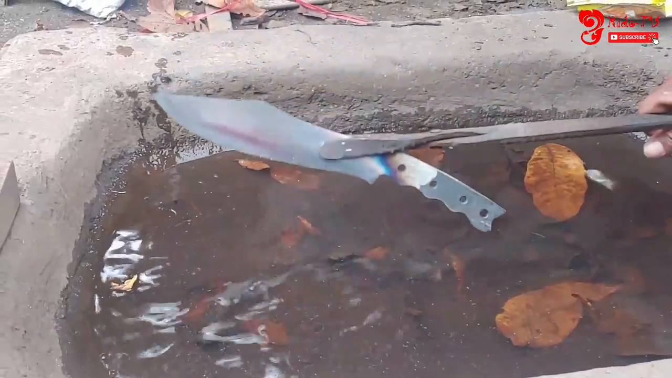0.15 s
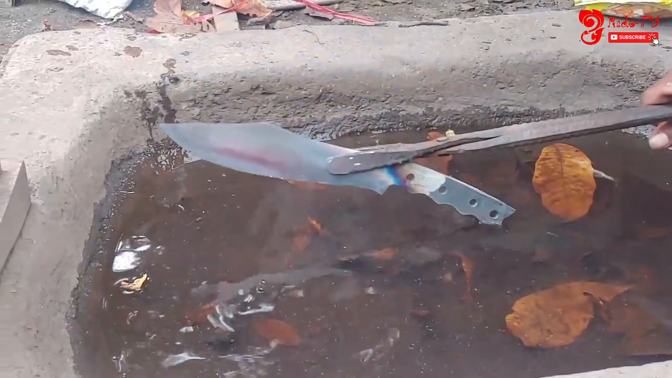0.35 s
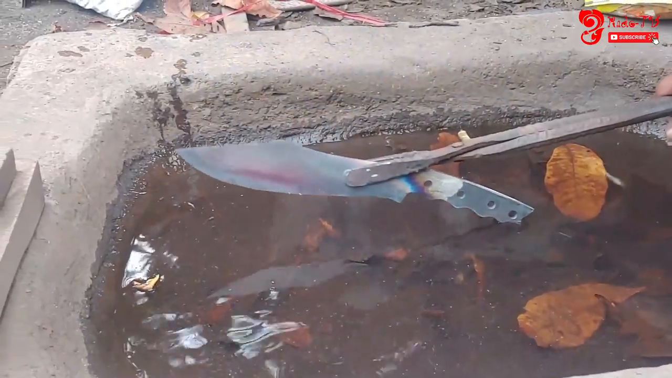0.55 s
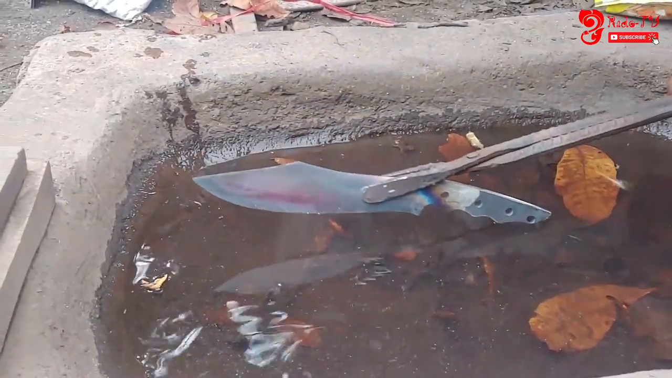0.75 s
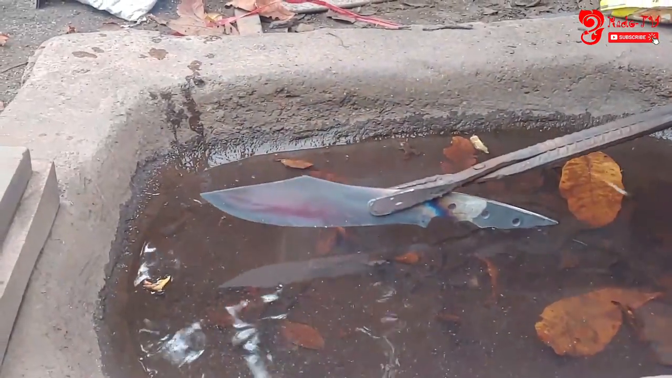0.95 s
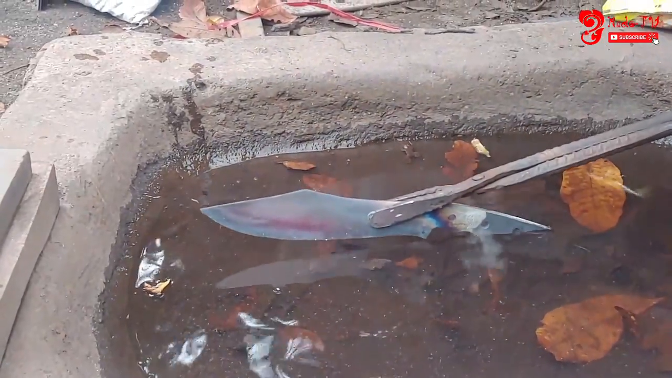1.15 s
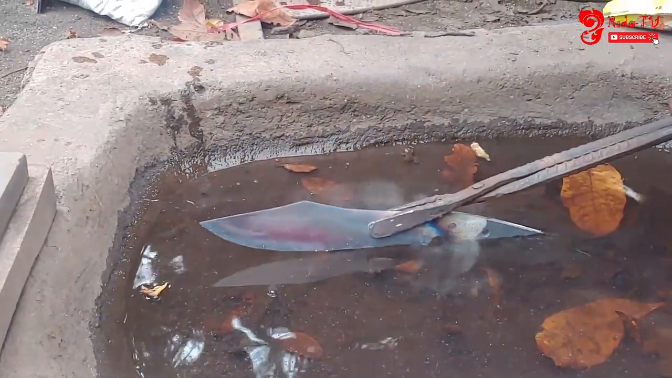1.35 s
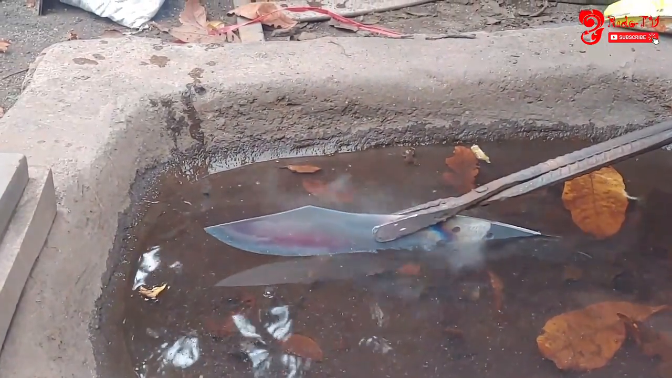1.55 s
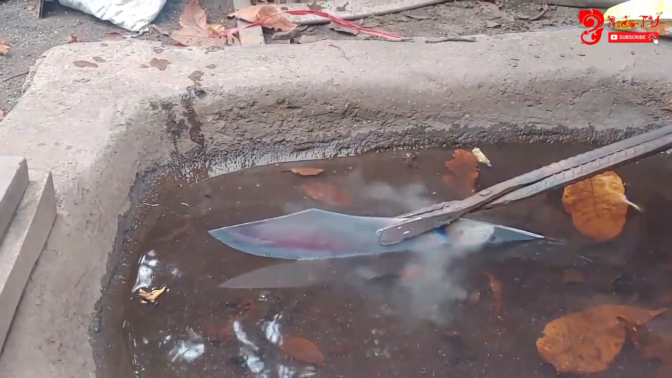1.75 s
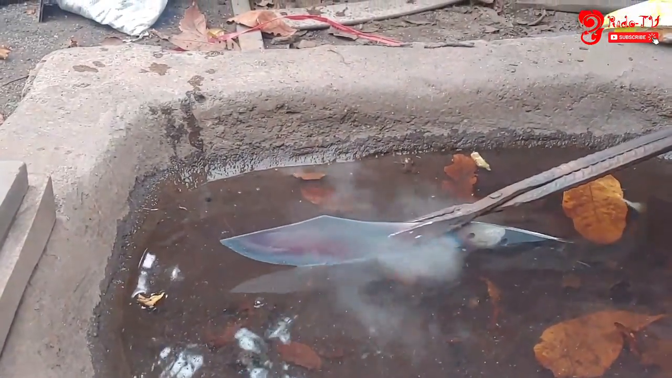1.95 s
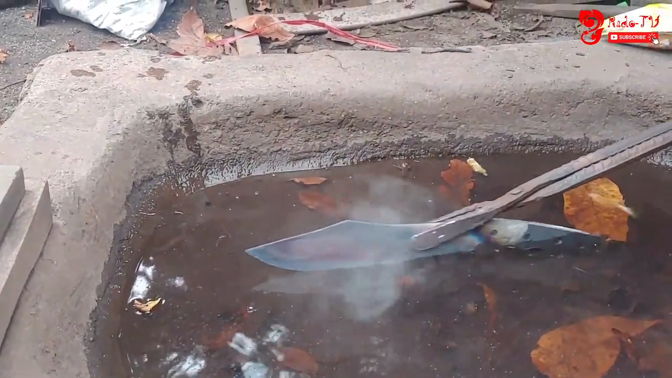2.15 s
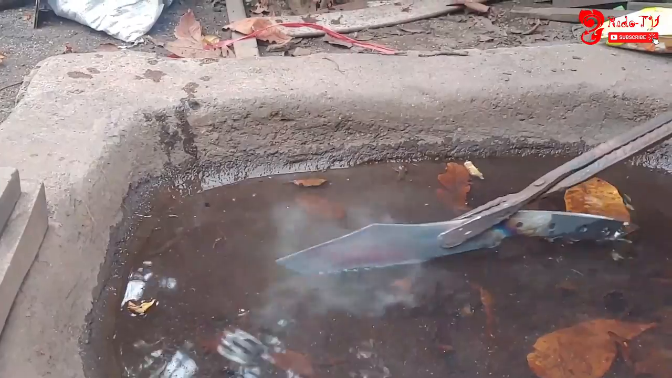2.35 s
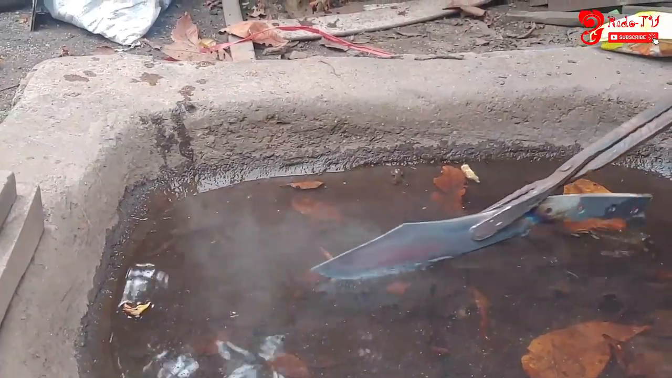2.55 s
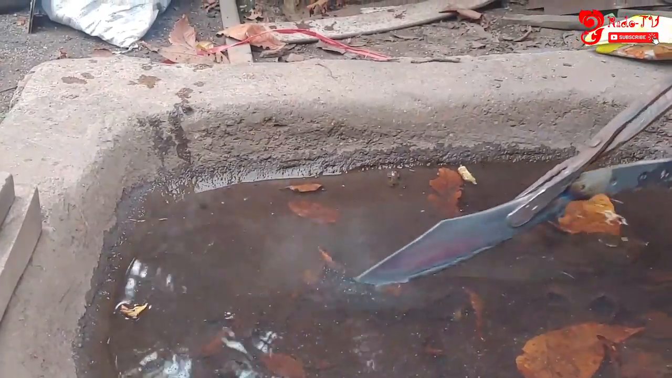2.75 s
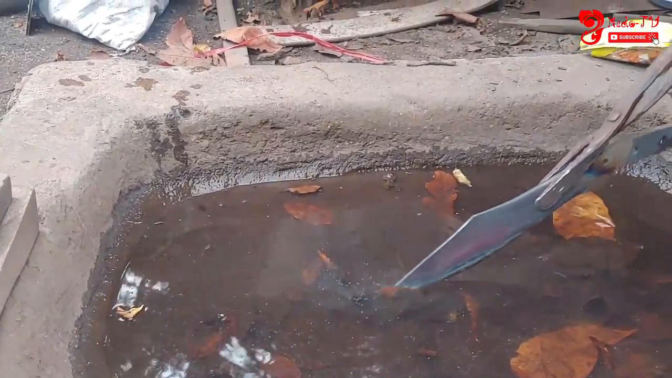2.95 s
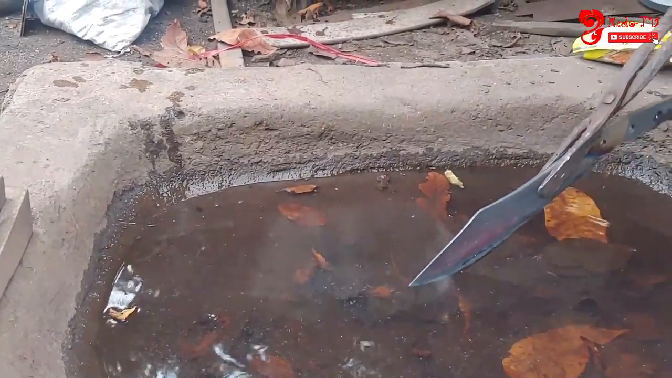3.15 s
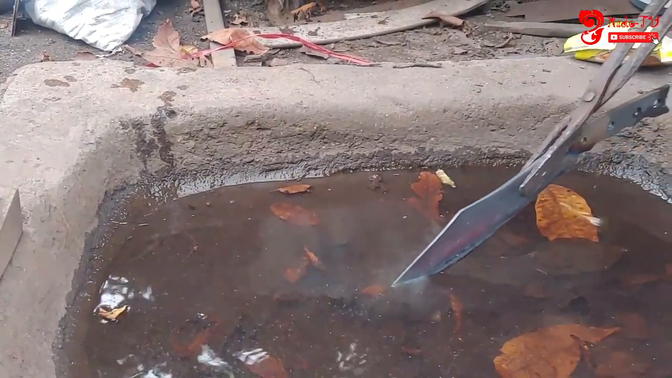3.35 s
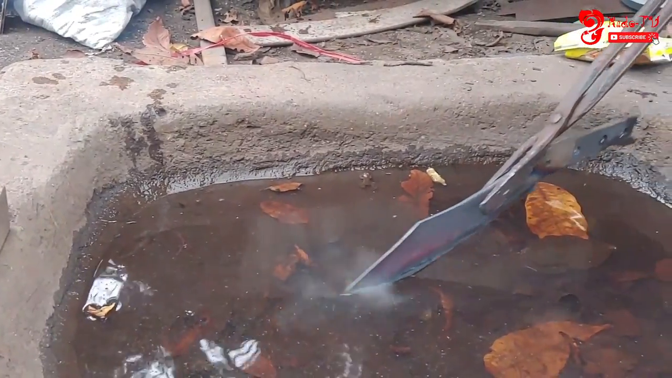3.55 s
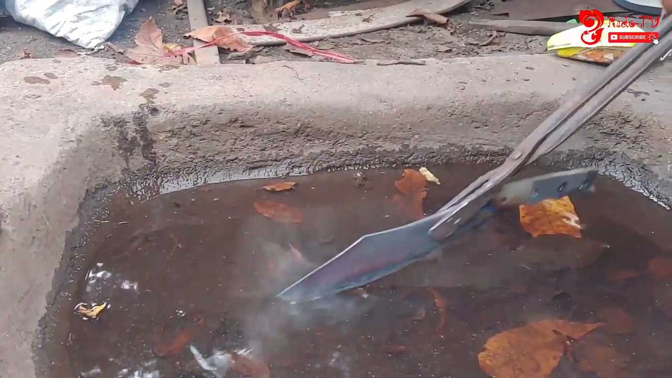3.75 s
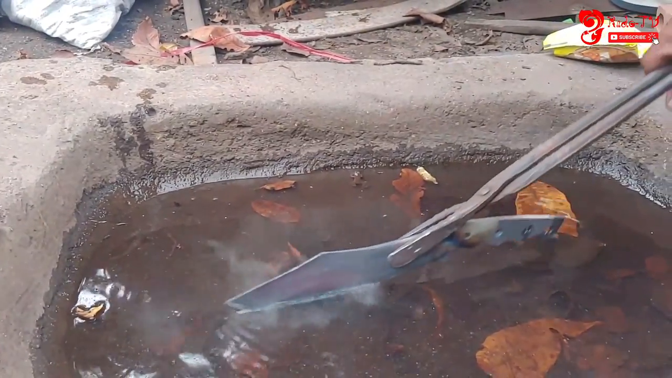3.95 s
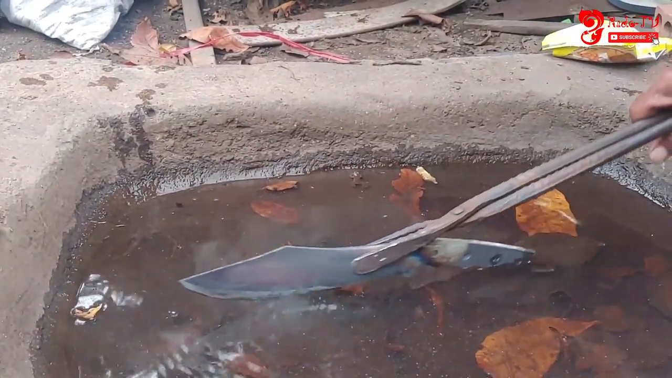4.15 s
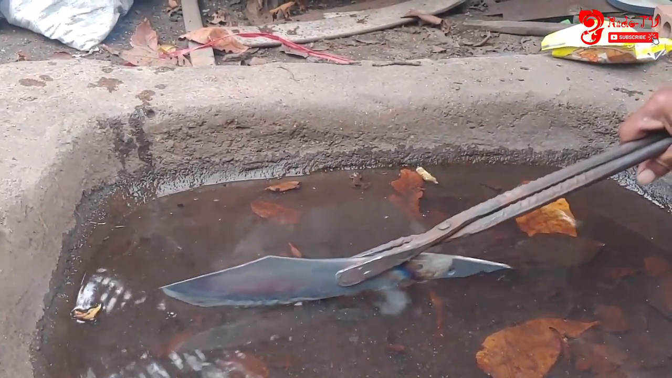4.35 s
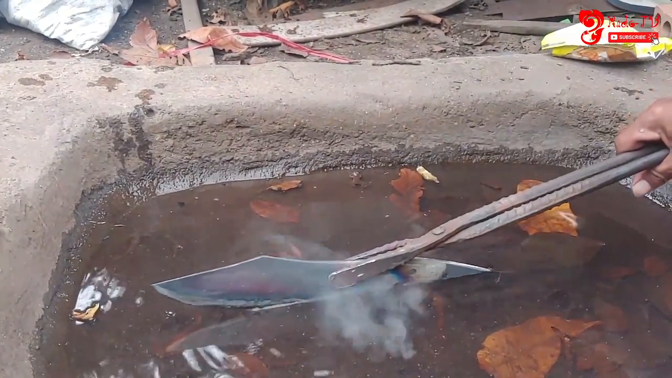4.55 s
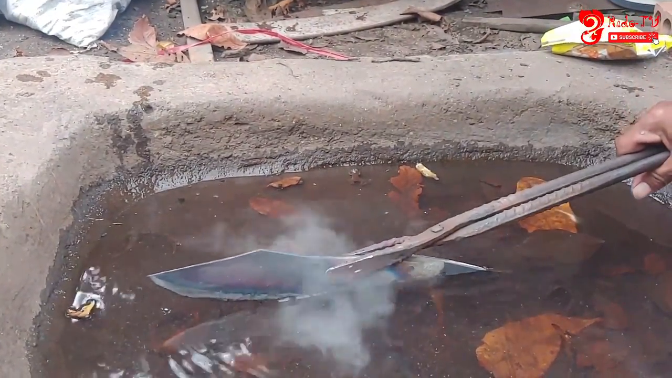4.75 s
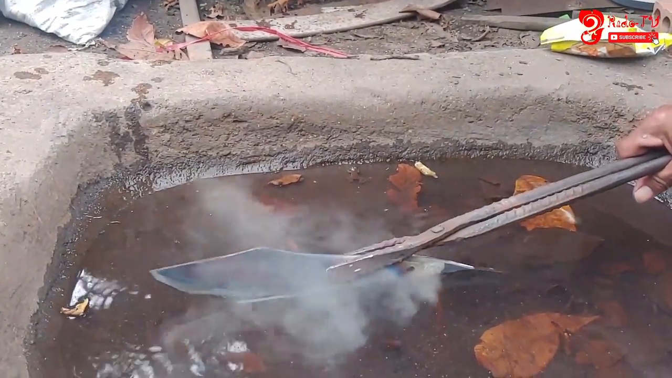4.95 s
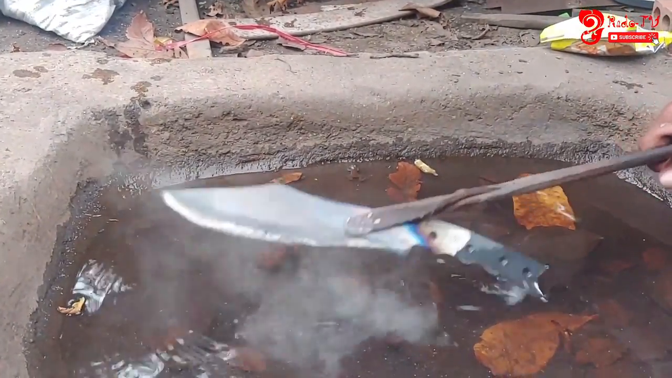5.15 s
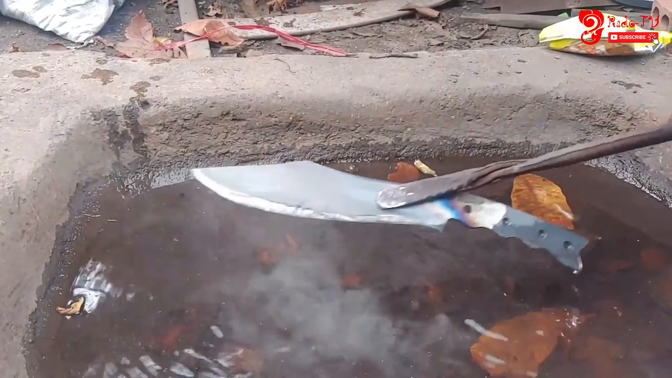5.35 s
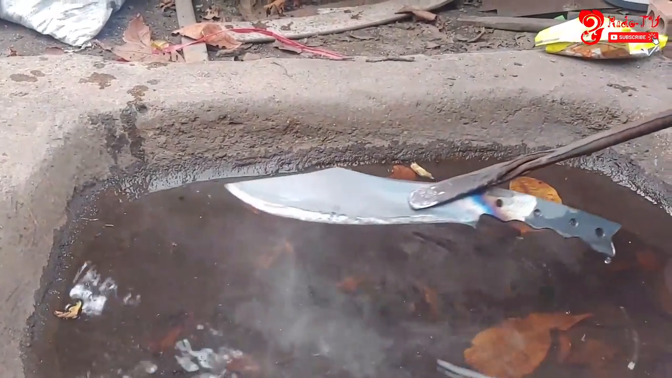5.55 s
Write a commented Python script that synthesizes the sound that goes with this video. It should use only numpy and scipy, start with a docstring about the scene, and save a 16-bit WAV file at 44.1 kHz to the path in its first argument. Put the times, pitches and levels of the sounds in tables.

```python
"""A faint idling thump and thin far whistles come first, then a red-hot blade enters a stone trough of water.
It goes in edge first, is rocked, dipped again and lifted out: steam bubbles burst as noisy clicks that hiss,
larger pockets spit as short ringing puffs, and wet steel sizzles on.
Beyond the open workshop a small bird whistles twice (gliding sines) and a single-cylinder engine picks up
speed (a pop and a pipe ring per firing). A far hum and quiet outdoor noise lie behind."""
import sys
import numpy as np
from scipy import signal
from scipy.fft import rfft, irfft
from scipy.io import wavfile

SR = 44100
rng = np.random.default_rng(int(sys.argv[2]) if len(sys.argv) > 2 else 0)


def file_out(sig):
    """Save sig as 16-bit WAV at sys.argv[1]."""
    # one column per channel
    cols = np.atleast_2d(sig).T
    # limit, then scale
    lim = np.clip(cols, -1, 1)
    pcm = np.round(lim * 32767).astype(np.int16)
    wavfile.write(sys.argv[1], SR, pcm)


N = 247401
TIME, HZ = np.arange(N) / SR, np.fft.rfftfreq(N, 1 / SR)

# fizz spectrum, relative: f/Hz, level/(dB per Hz)
FIZZ_SPECTRUM = [(200, -35.5), (1350, -42.5), (1750, -18.5), (2020, -25.5), (2400, -19.5), (3250, -15),
                 (3700, -13), (4800, -12), (5700, -8), (6500, -1.5), (7500, 0), (9000, -12), (12000, -15.5),
                 (15700, -25.5)]
# resonances of the churning water in the trough, relative: f/Hz, width/Hz, level/dB
TROUGH_MODES = [(370, 130, -13), (631, 76, -7.5), (1073, 125, 3), (1305, 88, 1), (1833, 170, 6.5),
                (2396, 330, 7.5), (3260, 810, 6.5)]
# thin sizzle of the wet steel, relative: f/Hz, width/Hz, level/dB
SIZZLE_MODES = [(2740, 360, -4), (4740, 1300, -3.5), (7370, 2000, 12), (11700, 650, 5)]
# narrow bands of the first small point of contact, relative: f/Hz, width/Hz, level/dB
TOUCH_MODES = [(2400, 100, -26), (6260, 450, 4), (7280, 180, 10), (8600, 360, -0.5)]
# contact sizzle: t/s, level/dB
TOUCH_CURVE = [(.78, -83), (.818, -45), (.93, -50), (.975, -34.5), (1.12, -32.5), (1.3, -68), (1.5, -120)]
# hiss balance between the channels: f/Hz, left minus right/dB
CHANNEL_TILT = [(1000, 0.5), (1550, 1.5), (2000, -2), (4500, 1), (6400, -1), (7500, 10.5), (8500, 7.5),
                (10000, 1.5), (12500, -1.5), (15000, 0.5)]
FIZZ_TRIM_DB, SIZZLE_TRIM_DB = 3.5, 12.5  # added to the levels from boiling()


def quench():
    """The vapour film keeps collapsing and re-forming, so the boiling sputters."""
    fizz_gain, churn_gain, sizzle_gain = boiling()
    sputter = gain_of(.75 * waver(rate_hz=130))
    tilt = gain_of(read(CHANNEL_TILT) * np.array([[.5], [-.5]]))
    tilt = tilt / np.sqrt(np.mean(tilt ** 2, axis=0))

    fizz = bubbles(per_s=7000, spread_db=.5, wash=1, t60=.047, flicker_db=-.5)
    fizz = evened(colour(fizz, read_gain(FIZZ_SPECTRUM) * tilt))
    churn = bubbles(per_s=1500, spread_db=.5, wash=.84, t60=.029, flicker_db=0, count=4)
    churn = evened(slosh(colour(churn, resonances(TROUGH_MODES) * tilt)))
    sizzle = bubbles(per_s=2100, spread_db=-7.5, wash=.33, t60=.066, flicker_db=0, count=3)
    sizzle = evened(colour(sizzle, resonances(SIZZLE_MODES) * tilt))
    touch = evened(colour(rng.standard_normal((2, N)), resonances(TOUCH_MODES) * tilt))

    boil = fizz * fizz_gain * gain_of(FIZZ_TRIM_DB)
    boil = boil + churn * churn_gain
    boil = boil + sizzle * sizzle_gain * gain_of(SIZZLE_TRIM_DB)
    boil = boil + touch * gain_of(follow(TOUCH_CURVE)[0])
    return sputter * boil


# long first dip, going in then tilting out, before trims:
# t/s, tiny-bubble fizz level/dB, larger-bubble churn level/dB
FIRST_DIP = [
    [(0.77, -84, -82), (0.815, -51, -58), (0.925, -51.5, -75), (0.975, -41.5, -63), (1.07, -35, -57),
     (1.135, -25.5, -53), (1.44, -24, -42), (1.534, -17.5, -38.5), (2.002, -16, -34.5), (2.26, -18.5, -37),
     (2.36, -16, -34.5)],
    [(2.45, -20, -35), (2.6, -19.5, -34), (2.648, -19.5, -37), (2.68, -18.5, -33), (2.79, -21, -42.5),
     (2.846, -23.5, -49), (2.984, -21.5, -46.5), (3.022, -25, -54), (3.15, -30, -81)],
]
# later plunges, tip first, before trims:
# start t/s, length/s, fizz level/dB, churn level/dB, release/s, sizzle left on the wet steel level/dB
LATER_PLUNGES = [(3.093, 0.68, -20.5, -36.5, 0.06, -49), (3.851, 0.2, -15.5, -18.5, 0.12, -41.5),
                 (4.387, 0.29, -17, -23.5, 0.26, -52), (4.833, 0.22, -16.5, -18.5, 0.055, -67)]
FIZZ_ATTACK_S, CHURN_ATTACK_S = .051, .39  # tiny bubbles come at once, larger ones take time to grow
LIFT_DB_PER_S = 249  # the long dip dies as the tip leaves the water
HOT_CHURN_DB, DRYING_DB_PER_S = 6, 6  # extra churn in the long dip; fade of the sizzle after each plunge
DAMP_BEFORE_TRIM_DB, DAMP_AT_S, DAMP_SPAN_S = -81, .12, .11  # damp blade's one sizzle swell before the dip


def boiling():
    """Gains of fizz, churn and sizzle: plunges swell, hold, and die to a sizzle that lasts into the next."""
    dip = np.concatenate(FIRST_DIP)
    lifted_db = LIFT_DB_PER_S * np.maximum(TIME - dip[-1, 0], 0)
    # fizz and churn add up as powers
    fizz, churn = [gain_of(db - lifted_db) ** 2 for db in follow(dip)]
    churn = churn * gain_of(HOT_CHURN_DB) ** 2
    sizzle = gain_of(DAMP_BEFORE_TRIM_DB) * np.exp(-((TIME - DAMP_AT_S) / DAMP_SPAN_S) ** 2)
    next_starts = [row[0] for row in LATER_PLUNGES[1:]] + [np.inf]
    for (start, length, fizz_db, churn_db, release, left_db), until in zip(LATER_PLUNGES, next_starts):
        age_s = np.maximum(TIME - start, 0)
        out_s = np.maximum(TIME - start - length, 0)
        contact = np.exp(-(out_s / release) ** 2)
        fizz = fizz + ((1 - np.exp(-age_s / FIZZ_ATTACK_S)) * gain_of(fizz_db) * contact) ** 2
        churn = churn + ((1 - np.exp(-age_s / CHURN_ATTACK_S)) * gain_of(churn_db) * contact) ** 2
        left = gain_of(left_db - DRYING_DB_PER_S * out_s)
        sizzle = sizzle + (1 - contact) * left * (TIME < until + FIZZ_ATTACK_S)
    return np.sqrt(fizz), np.sqrt(churn), sizzle


# trough echoes reach the two channels in step (+) or opposed (-): f/Hz, likeness/1
CHANNEL_LIKENESS = [(600, 0.1), (1060, 0.68), (1410, 0.075), (1730, -0.041), (2030, -0.12), (2360, 0.36),
                    (2800, 0.07), (3280, -0.45), (3850, -0.016), (4650, 0.34), (5400, -0.26), (6200, 0.058),
                    (7400, -0.1), (10000, 0.081)]
ROAM_DB, ROAM_HZ = 5, 3  # the boiling wanders from spot to spot
WALL_ECHO, WALL_DELAY_MIN_S, WALL_DELAY_MAX_S = .28, .0008, .004  # each spot's own trough-wall echo


def bubbles(per_s, spread_db, wash, t60, flicker_db, count=6):
    """Bursts of uneven size roam over spots along the edge; trough walls colour each spot differently."""
    like = np.clip(read(CHANNEL_LIKENESS), -.95, .95)
    direct = np.sqrt(abs(like)) * np.array([np.ones_like(like), np.sign(like)])
    scattered = np.sqrt(1 - abs(like))
    out = 0
    for spot in range(count):
        activity = gain_of(ROAM_DB * np.tanh(waver(ROAM_HZ)))
        size_db = spread_db * np.minimum(rng.exponential(1, N), 4)
        size = gain_of(size_db + flicker_db * waver(rate_hz=21))
        bursting = rng.random(N) < per_s / count / SR
        clicks = evened(size * rng.choice([-1, 1], N) * bursting)
        merged = wash * rng.standard_normal(N)  # bubbles too small to tell apart
        delay_s = rng.uniform(WALL_DELAY_MIN_S, WALL_DELAY_MAX_S)
        wall = 1 + WALL_ECHO * np.exp(-2j * np.pi * HZ * delay_s)
        paths = direct + scattered * reflections(t60)
        out = out + rfft(activity * (clicks + merged)) * wall * paths
    return evened(irfft(out, N))


SLOSH, SLOSH_HZ = .015, 2.5  # rms share of the pitch drift, and its rate
FIRST_SAG, SETTLED_S = .05, 2.2  # starts lower by this share; settles from half this time on


def slosh(x):
    """Varies the read-out speed: trough resonances drift as the water rocks and rise as the blade sinks in."""
    sag = np.interp(TIME, [SETTLED_S / 2, SETTLED_S], [FIRST_SAG, 0])
    ratio = 1 + SLOSH * waver(SLOSH_HZ) - sag
    place = np.cumsum(ratio) % N
    return np.array([np.interp(place, np.arange(N), channel) for channel in x])


# faint ticks of the damp blade before it goes in: t/s, level/dB, f/Hz, width/Hz, decay/s
DAMP_TICKS = [(.183, -60, 2000, 900, 0.016), (.288, -53, 6700, 1100, 0.0017),
              (.355, -60, 1600, 800, 0.0059)]
# larger steam pockets bursting, and low splashes as the blade meets the water: t/s, level/dB, f/Hz, width/Hz,
# decay/s
STEAM_SPITS = [(.805, -61.5, 480, 600, 0.047), (1.08, -52.5, 1780, 170, 0.18), (1.11, -56, 1300, 130, .016),
               (1.195, -52.5, 259, 120, .012), (1.525, -33.5, 2490, 260, 0.019),
               (1.721, -16, 4130, 260, 0.0064), (2.386, -23, 2470, 1490, 0.013),
               (2.392, -16.5, 5860, 2450, 0.0061), (2.395, -30.5, 1080, 175, 0.015),
               (2.427, -28, 1070, 150, 0.0045), (2.464, -35, 6900, 3000, 0.0016),
               (3.154, -22.5, 6600, 2960, 0.012), (3.243, -47.5, 1020, 150, 0.039),
               (3.317, -29.5, 2770, 1200, 0.014), (3.405, -47, 1020, 150, 0.014),
               (3.715, -47, 1000, 150, 0.05)]


def spits():
    """Ticks of the damp blade, low splashes of contact and bursting steam pockets, each a puff in one
    resonance."""
    return bursts([*DAMP_TICKS, *STEAM_SPITS], apart=1)


# dull low bumps: t/s, level/dB, f/Hz, width/Hz, decay/s
LOW_BUMPS = [(.97, -44.5, 70.6, 25, 0.048), (1.41, -47, 85.5, 30, 0.034), (3.08, -41.5, 82.5, 48.4, 0.042),
             (3.51, -39, 81.4, 34.7, 0.039)]


def bumps():
    """Dull low bumps: soft-edged puffs of low narrow noise, nearly alike in both channels."""
    return bursts(LOW_BUMPS, apart=.13, softness=2)


def bursts(rows, apart, softness=1):
    """Puffs ringing one resonance; apart = how unlike the channels are, softness rounds the start."""
    out = np.zeros((2, N))
    for s, db, hz, width, decay in rows:
        noise = rng.standard_normal((3, N))
        ring = evened(colour(noise[2] + apart * noise[:2], resonances([(hz, width, 0)])))
        age = np.maximum(TIME - s, 0) / decay
        envelope = 2 * (1 - np.exp(-4 * age)) ** softness * np.exp(-np.minimum(age, 50))
        out += gain_of(db) * ring * envelope
    return out


# the bird's two upslurs, before BIRD_DB: t/s, f/Hz, level/dB
BIRD_CALLS = [
    [(.764, 3020, -62), (.783, 3350, -46), (.803, 3680, -47), (.822, 4020, -50), (.868, 4200, -56),
     (.882, 4300, -46), (.9, 4400, -40), (.93, 4480, -39), (.941, 5200, -41), (.955, 6550, -36),
     (.964, 6650, -50)],
    [(5.264, 3000, -55), (5.29, 3480, -43), (5.305, 3620, -38), (5.315, 4050, -41), (5.35, 4300, -42),
     (5.38, 4520, -41), (5.395, 4620, -52), (5.406, 4850, -44), (5.43, 5350, -45), (5.437, 6100, -33),
     (5.446, 6750, -30), (5.458, 6700, -44)],
]
# faint level whistles around the calls, before BIRD_DB: start t/s, length/s, f/Hz, level/dB
FAINT_NOTES = [(.03, .36, 6250, -64), (.42, .62, 3360, -65), (.38, .76, 2370, -68), (.496, .4, 1740, -76),
               (.36, .62, 1290, -65), (.722, .06, 5070, -60), (.724, .04, 3360, -55),
               (5.26, .07, 1245, -47), (5.3, .23, 1245, -49)]
BIRD_DB, BIRD_WET_DB = -4.5, 6.5  # trim of the far bird; its echoes relative to it


def bird():
    """A quavering whistle slides up and ends in a flick, far off among echoing walls."""
    song = np.zeros(N)
    for call in BIRD_CALLS:
        hz, level_db = follow(call)
        hz = hz * (1 + .015 * waver(rate_hz=260))
        gate = np.clip(np.minimum(TIME - call[0][0], call[-1][0] - TIME) / .006, 0, 1)
        quaver_db = 2.4 * waver(rate_hz=200)
        song += gate * gain_of(level_db + quaver_db) * np.sin(2 * np.pi * np.cumsum(hz) / SR)
    for start, length, hz, level_db in FAINT_NOTES:
        arch = np.sin(np.pi * np.clip((TIME - start) / length, 0, 1)) ** 2
        flutter = gain_of(level_db + 3 * waver(rate_hz=25))
        wobbling_hz = hz + 45 * waver(rate_hz=90)
        song += arch * flutter * np.sin(2 * np.pi * np.cumsum(wobbling_hz) / SR)
    return gain_of(BIRD_DB) * yard(song, t60=.3, wet_db=BIRD_WET_DB)


# exhaust resonances, relative (idle thump, thump under throttle, bark): f/Hz, width/Hz, level/dB
IDLE_THUMP_MODES = [(72, 42, 7.5), (90, 11, 9.5), (137, 20, -3)]
LOADED_THUMP_MODES = [(94, 14, 4), (144, 48, -2.5), (190.6, 7.3, -2), (261, 26, -3.5)]
BARK_MODES = [(312.7, 9.4, 5.5), (306, 22, -19), (523, 690, 1.5), (720, 130, -41)]
# thump pitch rises with speed: rate/(firings per s), f/Hz
PITCH_BY_RATE = [(10, 75.4), (18, 109), (23.5, 139.4)]
# even rush of gas under throttle, relative: f/Hz, level/(dB per Hz)
RUSH_SPECTRUM = [(400, 0), (750, 8.5), (1300, 3), (1600, -5.5), (3500, -4.5), (5000, -3.5), (6500, 6.5),
                 (8200, -4), (15000, -16.5)]
# deep exhaust flutter under throttle, relative: f/Hz, width/Hz, level/dB
RUMBLE_MODES = [(60, 16, 2), (36, 20, -12)][0] if isinstance([(60, 16, 2), (36, 20, -12)], tuple) else [(60, 16, 2), (36, 20, -12)]
THROTTLE_OPENS_S, SPIN_UP_S, LOAD_RISE_S = 4.235, .55, .14
IDLE_RATE, IDLE_WANDER = 9.6, .096  # firings per s; rms share of drift
KICK_RATE, TOP_RATE = 15.57, 24.67  # firings per s as the throttle opens, and approached in the end
UNEVEN_FLOOR_DB, UNEVEN_IDLE_DB = 1.3, 6  # swing at any speed; added swing at idle rate
IDLE_THUMP_DB, THUMP_SOFT_DB, THUMP_SETTLE_S = -46.5, 14, 2.66  # settled level; softer start; settling time
IDLE_BARK_DB, BARK_GROWTH_DB_PER_S = -80, 3  # bark at the start; slow growth
LOAD_THUMP_DB, EASING_DB_PER_S = -37.5, 1.5  # level at throttle opening; fade from there
LOAD_BARK_DB, RUSH_DB, RUMBLE_DB = -39, -41.5, -45.5  # at top speed
THUMP_POP_S, BARK_POP_S, BARK_RINGING = .0075, .0024, .4  # pop times to peak; bark's ring next to its pop
PIPE_ECHO = .75


def engine():
    """One cylinder idles unevenly, then speeds up, steadies and grows louder and harder."""
    since = TIME - THROTTLE_OPENS_S
    idling = IDLE_RATE * (1 + IDLE_WANDER * waver(rate_hz=3.3))
    revving = TOP_RATE - (TOP_RATE - KICK_RATE) * np.exp(-np.maximum(since, 0) / SPIN_UP_S)
    firings = np.where(since < 0, idling, revving)
    turns = np.cumsum(firings) / SR
    turns = turns - np.interp(THROTTLE_OPENS_S, TIME, turns)  # a firing falls on the opening
    swing_db = UNEVEN_FLOOR_DB + UNEVEN_IDLE_DB * (IDLE_RATE / firings) ** 2
    strength = gain_of(swing_db * np.tanh(waver(rate_hz=5.5)))
    speed = firings / TOP_RATE
    load = np.clip(.5 + since / LOAD_RISE_S, 0, 1)

    thump_hz = np.interp(firings, *np.transpose(PITCH_BY_RATE))
    soft = exhaust(turns, firings, strength, IDLE_THUMP_MODES, thump_hz, pop_s=.017, ringing=2.5)
    hard = exhaust(turns, firings, strength, LOADED_THUMP_MODES, thump_hz, THUMP_POP_S, ringing=.84)
    bark_hz = 315 * (1 + .06 * np.tanh(waver(rate_hz=15)))  # no two firings are quite alike
    bark = exhaust(turns, firings, strength, BARK_MODES, bark_hz, BARK_POP_S, BARK_RINGING, PIPE_ECHO)

    idle = soft * gain_of(IDLE_THUMP_DB - THUMP_SOFT_DB * np.exp(-TIME / THUMP_SETTLE_S))
    idle = idle + bark * gain_of(IDLE_BARK_DB + BARK_GROWTH_DB_PER_S * TIME)
    loaded = hard * gain_of(LOAD_THUMP_DB - EASING_DB_PER_S * since)
    loaded = loaded + bark * gain_of(LOAD_BARK_DB) * speed ** 2
    rush = evened(colour(rng.standard_normal((2, N)), read_gain(RUSH_SPECTRUM)))
    rumble = evened(colour(rng.standard_normal(N), resonances(RUMBLE_MODES)))
    gas = rush * gain_of(RUSH_DB) + rumble * gain_of(RUMBLE_DB)
    return (1 - load) * idle + load * (loaded + gas * speed ** 4)


PIPE_TRIP_S, SILENCER_HZ = .0064, 620  # delay of the pipe echo; the silencer rounds off all above
WALLS_DB = -10  # walls' echo next to the near sound, before both are evened


def exhaust(turns, firings, strength, modes, pop_hz, pop_s, ringing, echo=0):
    """Each firing pops at the pipe mouth; the pipe rings on, stirred by the gas that follows."""
    phase = turns % 1
    age_s = phase / firings
    pulses = evened(np.diff(np.floor(turns), prepend=np.floor(turns[0])) * strength)
    puffs = evened(np.exp(-phase / .7) * rng.standard_normal(N))
    radiated = 1 / (1 + (52 / (HZ + 1)) ** 6)  # a small pipe mouth gives off no deep bass
    muffled = radiated / (1 + (HZ / SILENCER_HZ) ** 8)
    pipe = 1 + echo * np.exp(-2j * np.pi * HZ * PIPE_TRIP_S)
    swell = age_s * np.exp(-age_s / pop_s) * (1 - phase ** 4)
    pop = evened(colour(strength * swell * np.sin(2 * np.pi * pop_hz * age_s), muffled * pipe))
    ring = evened(colour(pulses + .8 * puffs, resonances(modes) * muffled))
    near = pop + ringing * ring
    walls = colour(near, reflections(t60=.18))
    walls = walls + .25 * walls[::-1]  # partly shared between the channels
    return evened(near + gain_of(WALLS_DB) * evened(walls))


# far hum that swells and ebbs: t/s, level/dB
TONE_CURVE = [(0, -74), (2.1, -68.5), (2.47, -53.5), (2.9, -67), (3.5, -58), (3.85, -51.5), (4.15, -47),
              (4.35, -62)]
# whirr above it: t/s, level/dB
WHIRR_CURVE = [(0.0, -82), (2.42, -62), (2.96, -58), (3.1, -49), (3.38, -51), (3.5, -56.5), (3.66, -44.5),
               (3.82, -55), (3.92, -46), (4.17, -47), (4.4, -42.5), (4.86, -44), (5.5, -43)]
# bands of the whirr, relative: f/Hz, width/Hz, level/dB
WHIRR_MODES = [(291, 72, 0), (456, 50, 7), (834, 300, -13), (1200, 76, -19)]
WHIRR_FLUTTER_DB = 2.5


def hum(tone_hz=189):
    """A low tone wavers in pitch and strength, with bands of whirr above it."""
    wavering_hz = tone_hz * (1 + .0177 * waver(rate_hz=16.6))
    tone = np.sin(2 * np.pi * np.cumsum(wavering_hz) / SR)
    tone = evened(tone * gain_of(5 * np.tanh(waver(rate_hz=14))))
    noise = rng.standard_normal((3, N))
    whirr = colour(noise[2] + .5 * noise[:2], resonances(WHIRR_MODES))
    whirr = evened(whirr * gain_of(WHIRR_FLUTTER_DB * np.tanh(waver(rate_hz=9))))
    return tone * gain_of(follow(TONE_CURVE)[0]) + whirr * gain_of(follow(WHIRR_CURVE)[0])


# outdoor background, relative: f/Hz, level/(dB per Hz)
AIR_SPECTRUM = [(15, -38), (25, 10.5), (98, -4), (231, -14), (271, -1), (344, -11.5), (1000, -16),
                (1240, -10.5), (1580, -14), (2370, -13), (2850, -13), (3350, -17), (3730, -21.5),
                (7090, -12), (9500, -27), (15000, -46)]
AIR_DB = -61.5


def air():
    """Quiet outdoor noise, mostly alike in both channels in the bass."""
    noise = rng.standard_normal((3, N))
    same = .85 / (1 + (HZ / 700) ** 2)
    both = colour(noise[2], np.sqrt(same)) + colour(noise[:2], np.sqrt(1 - same))
    return gain_of(AIR_DB) * evened(colour(both, read_gain(AIR_SPECTRUM)))


def gain_of(db):
    """Decibels to amplitude."""
    return 10 ** (np.asarray(db) / 20)


def evened(x):
    """Scales to unit rms."""
    return x / np.sqrt(np.mean(x ** 2) + 1e-20)


def read(points):
    """Joins up a short spectrum on a log-frequency axis."""
    hz, value = np.transpose(points)
    return np.interp(np.log(HZ + 1), np.log(hz + 1), value)


def read_gain(points):
    """A short dB spectrum as a frequency response."""
    return gain_of(read(points))


def follow(rows):
    """The columns of a curve at every sample."""
    s, *columns = np.transpose(rows)
    return [np.interp(TIME, s, column) for column in columns]


def colour(x, response):
    """Filters by a frequency response."""
    return irfft(rfft(x) * response, N)


def resonances(modes):
    """Response of a set of steep-sided resonances."""
    total = 0
    for hz, width, db in modes:
        detune = (HZ ** 2 - hz ** 2) / (1.55 * width * (HZ + 1))  # 1.55 makes width the -3 dB width
        total = total + gain_of(db) / (1 + 1j * detune) ** 2
    return total


def waver(rate_hz):
    """Slow random drift of unit rms: low-passed noise."""
    return evened(colour(rng.standard_normal(N), 1 / (1 + (HZ / rate_hz) ** 2)))


def reflections(t60):
    """Response of scattered echoes that die by 60 dB in t60 s, different in each channel."""
    taps = rng.standard_normal((2, N)) * gain_of(-60 * np.minimum(TIME / t60, 3))
    return rfft(taps / np.linalg.norm(taps, axis=1, keepdims=True))


def yard(x, t60, wet_db):
    """A far sound with the echoes of the walls around."""
    return x + gain_of(wet_db) * colour(x, reflections(t60))


def scene():
    """The quench close by, everything else behind it."""
    return quench() + spits() + bumps() + bird() + engine() + hum() + air()


def record(dry):
    """Peaks are rounded off below 0.88 of full scale; then a steep low-pass at 15.9 kHz."""
    held = dry / (1 + (dry / .88) ** 8) ** (1 / 8)
    low_pass = signal.firwin(1023, 15900, window=("kaiser", 10), fs=SR)
    return signal.oaconvolve(held, low_pass[None], "same")


dry = scene()
out = record(dry)
file_out(out)
```